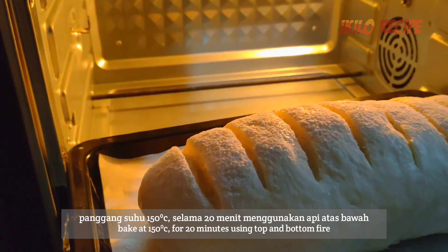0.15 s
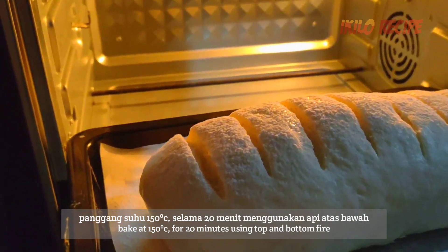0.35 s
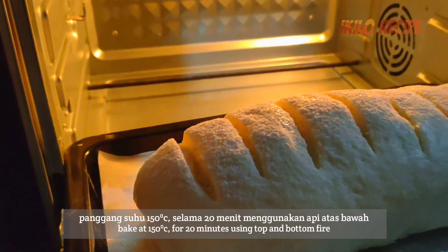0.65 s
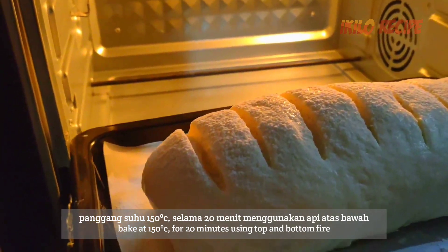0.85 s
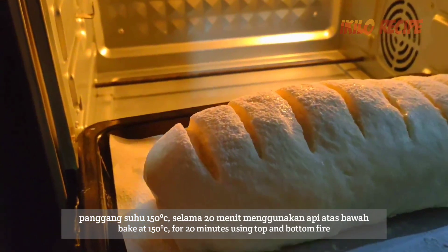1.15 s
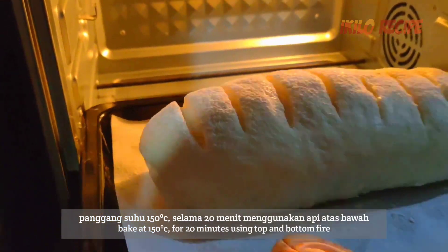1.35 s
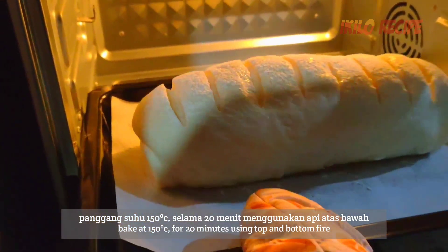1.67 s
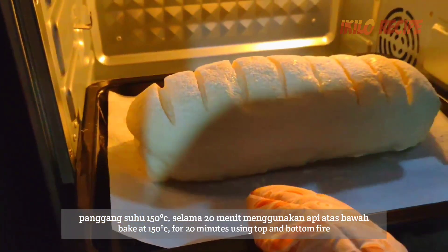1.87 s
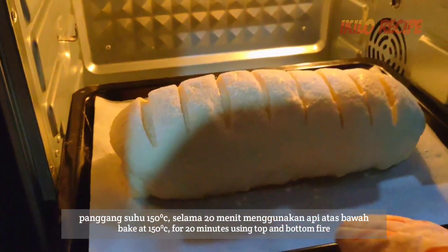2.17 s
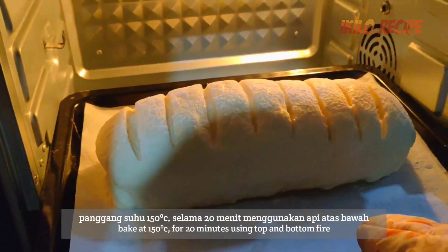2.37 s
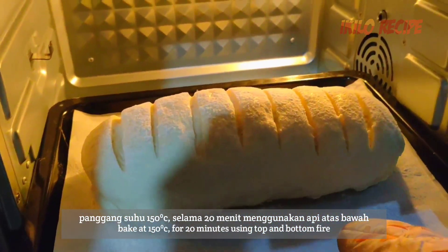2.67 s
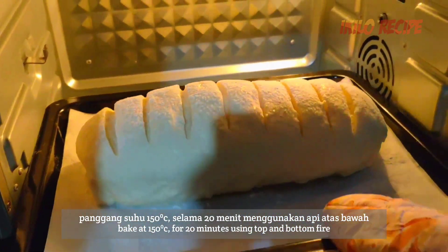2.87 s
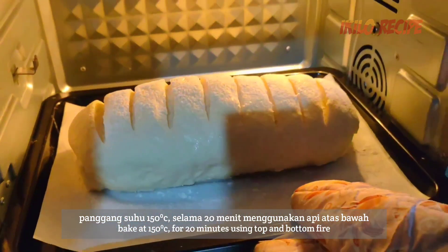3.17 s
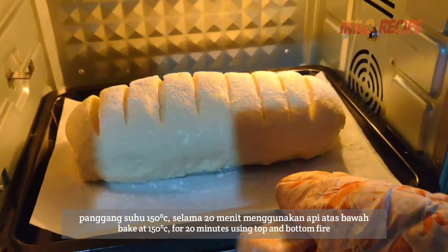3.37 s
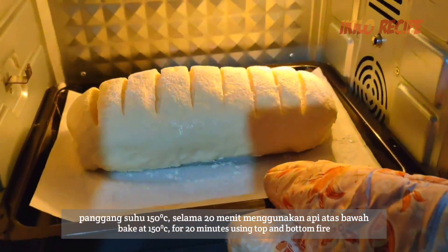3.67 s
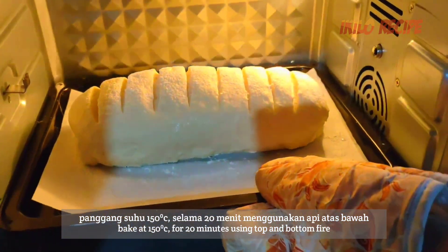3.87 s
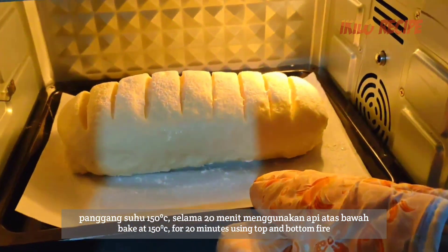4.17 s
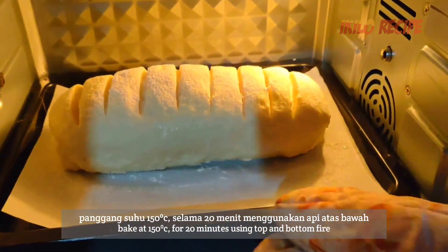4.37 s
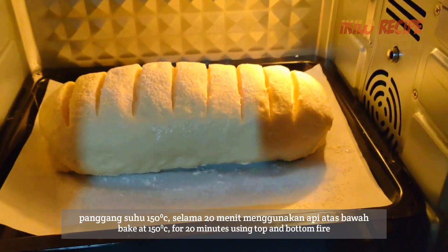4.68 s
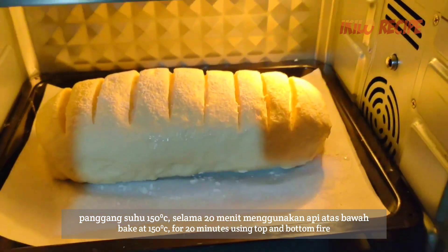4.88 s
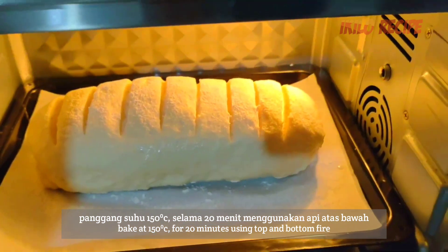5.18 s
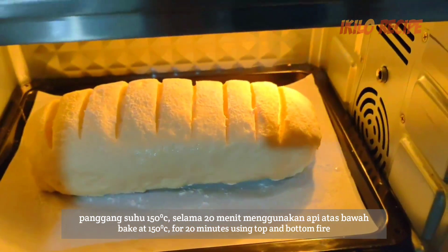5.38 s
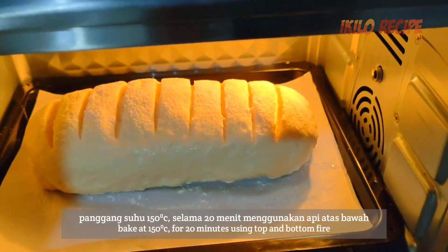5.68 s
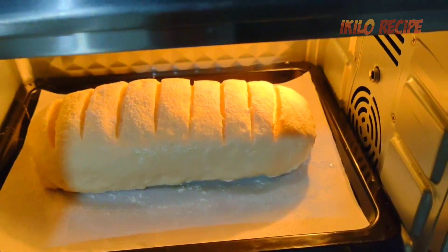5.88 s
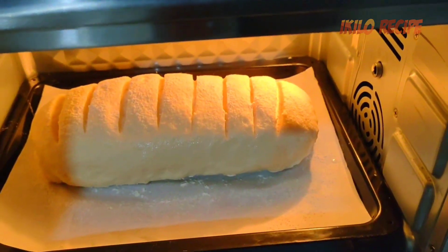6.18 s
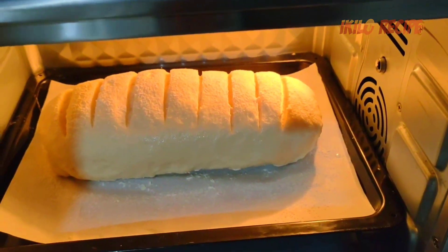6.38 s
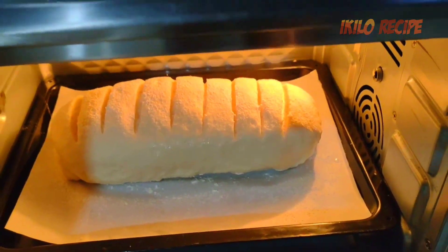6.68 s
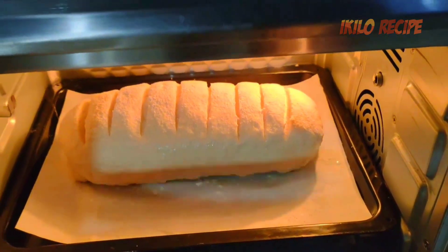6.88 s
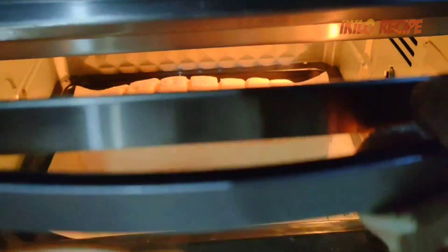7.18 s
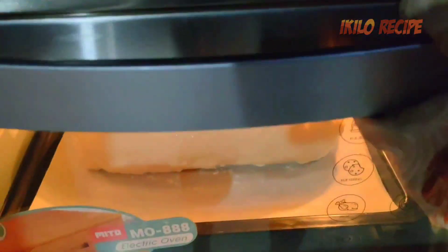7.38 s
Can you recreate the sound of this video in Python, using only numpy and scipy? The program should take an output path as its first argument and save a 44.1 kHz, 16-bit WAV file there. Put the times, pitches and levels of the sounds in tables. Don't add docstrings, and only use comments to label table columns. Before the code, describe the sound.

Close stereo pickup at a small metal oven in a quiet kitchen, with very low room hum and hiss. A clockwork timer ticks evenly throughout, roughly four dry clicks per second, slightly softer at first. From 0 to 1.4 s the tray barely moves: light hollow taps near 0.1, 0.5 and 1.2 s, faint rubbing and small squeaks. At 1.5 s a hard flat knock rebounds, followed by a clanking edge knock at 1.65 s, brisk gritty scraping and a weaker knock at 1.95 s. After a lull, scraping resumes around 2.7 s, with a dull knock at 3.05 s and a faint low one at 3.5 s. At 4.1 s the tray bangs the back wall, ringing briefly and humming low for about a second. Then mostly ticking, with tiny handling noises; fumbling and soft bumps increase from 6.6 s. At 7.5 s the glass door strikes its frame sharply and the sound cuts off.

```python
import sys
import numpy as np
from scipy import signal
from scipy.fft import rfft, irfft
from scipy.io import wavfile
from scipy.ndimage import uniform_filter1d

SR = 44100
rng = np.random.default_rng(int(sys.argv[2]) if len(sys.argv) > 2 else 0)


def volts(x):
    e = np.asarray(x, float) / 20
    return 10 ** e


def inscribe(sig):
    pcm = np.round(np.clip(np.atleast_2d(sig).T, -1, 1) * 32767)
    wavfile.write(sys.argv[1], SR, pcm.astype(np.int16))


N = 332514

# start in seconds, crack in dB, boom in dB, boom pitch in Hz, clang pitch in Hz.
FLAT_KNOCKS = [
    (1.5275, -22.5, -23, 228, 960),
    (1.5569, -30.5, -31, 213, 867),
    (3.05, -32, -30, 310, 610),
    (3.4935, -41.5, -41.5, 149, 845),
]
# start in seconds, crack in dB, boom in dB, boom and clang pitch in Hz.
EDGE_KNOCKS = [
    (1.6546, -23.5, -28, 275, 1115),
    (1.9455, -32, -35.5, 302, 1070),
    (4.9751, -63, -62, 380, 630),
]
# start in seconds, crack in dB, boom in dB, boom and clang pitch in Hz.
TAPS = [
    (0.1362, -44.5, -37.5, 202, 957),
    (0.4664, -68, -53, 224, 814),
    (1.1769, -49, -43, 148, 1003),
    (4.9751, -66, -73.5, 380, 640),
]
# start in seconds, crack in dB, boom in dB, boom pitch in Hz, clang pitch in Hz.
SCUFFS = [(1.045, -77, -57, 286, 790), (1.8384, -49.5, -58, 232, 2160), (1.99, -45.5, -37.5, 342, 836),
          (2.2515, -64, -41.5, 304, 670), (2.2979, -59.5, -43.5, 375, 1097), (2.4398, -58, -48, 293, 593),
          (3.089, -42.5, -38.5, 418, 885), (3.313, -50, -55, 194, 795), (3.6453, -55.5, -50.5, 330, 2190),
          (6.611, -60, -58, 237, 1330), (6.6224, -52, -51.5, 207, 1082), (6.8085, -65, -53.5, 247, 764),
          (6.9775, -56, -56, 268, 880), (6.996, -65, -50.5, 250, 554), (7.182, -58.5, -50.5, 240, 930),
          (7.196, -61.5, -48, 250, 554), (7.222, -78, -51, 250, 590), (2.5395, -61, -65, 293, 770)]
# start in seconds, crack in dB, boom in dB, boom and clang pitch in Hz.
BANG = [
    (4.0753, -21, -24.5, 188.6, 2184),
]
# start in seconds, crack in dB, boom in dB, boom pitch in Hz, clang pitch in Hz.
DOOR = [
    (7.5298, -20.5, -29.5, 262, 1582),
]
# pitch in Hz, level in dB, 60 dB decay in seconds.
SHELL = [(67, -8, 0.34), (107, -22, 0.2), (161, -16.5, 0.3), (176, -6, 0.56), (258, -4.5, 0.23),
         (275, -2, 0.81), (327.3, -4, 0.53), (381.7, -6.5, 0.58), (412, -15, 0.44), (488, -12.5, 0.39),
         (604, -25.5, .6), (814, -14, 0.61), (1220, -24.5, 0.22)]
# frequency in Hz, level in dB.
SHEET = [(300, -23.5), (450, -6.5), (800, -2.5), (1200, -6.5), (1600, -9), (2200, -8.5), (3000, -14),
         (4000, -15.5), (5000, -11.5), (5700, -13), (6500, -19), (7200, -25), (8300, -23), (10500, -31),
         (12100, -38), (15600, -34)]
# frequency in Hz, 60 dB decay in seconds.
SHEET_T60 = [(500, 1), (1500, 0.75), (3000, 0.51), (6000, 0.38), (12000, 0.39)]
# frequency in Hz, level in dB.
FLAT_TINT = [(450, -8.5), (900, 0.5), (1500, -1.5), (4200, 5), (5700, -1), (8300, 1.5), (15000, 2.5)]
EDGE_TINT = [(450, 5), (900, 5), (3000, -2.5), (5700, 1.5), (8300, -7.5), (12000, -5)]
LIGHT_TINT = [(450, -1), (1500, 0.78), (5700, -1), (9000, 1)]
WALL_TINT = [(450, 0.5), (800, -0.5), (1200, 1), (2200, 1), (3000, 1), (4000, -1), (5700, -1), (9000, 2.5),
             (12000, 1.5), (15000, 2.5)]
GLASS_TINT = [(450, -7), (900, 4), (1550, 9), (2500, -3), (4400, 2), (6500, 2), (9000, 10.5), (13000, 1.5)]
# pitch in Hz, peak in dB, 60 dB decay in seconds.
HUM = [(70, -33, 0.3), (114, -35, 0.45), (202, -41.5, 0.25), (264, -48.5, 1.9), (190, -50, 2),
       (387, -48, 1.6), (379, -35.5, .45), (434, -47.5, 0.75), (195, -48.5, 1.6), (275, -34.5, 0.3),
       (335, -40, 0.44), (368, -13.5, 0.11), (392, -25.5, 0.69), (412, -35, 0.59), (507, -29.5, 0.3),
       (522, -33.5, 0.36), (652, -40.5, .35), (823, -34, .35), (1226, -30, 0.21)]
# start in seconds, swell in seconds, hold in seconds, load in dB, speed in dB.
PUSHES = [(0.0, 0.013, 0.021, -60.5, -83.5), (0.044, 0.089, .05, -56, -74),
          (0.158, 0.053, .14, -53.5, -69.5), (0.396, 0.064, 0.14, -58.5, -70), (.62, 0.1, 0.12, -61.5, -69),
          (1.029, 0.048, 0.14, -59.5, -64.5), (1.182, 0.034, 0.15, -55.5, -70),
          (1.357, 0.14, .04, -48.5, -55.5), (1.57, 0.017, .08, -39.5, -58.5),
          (1.672, 0.082, 0.04, -41.5, -47.5), (1.798, 0.061, 0.058, -45.5, -43.5),
          (1.963, 0.039, 0.047, -42.5, -52), (2.12, 0.033, 0.055, -54, -74.5),
          (2.228, 0.035, 0.06, -52, -61.5), (2.412, 0.025, 0.11, -55, -70),
          (2.702, 0.15, 0.05, -49.5, -58.5), (2.848, 0.095, 0.19, -45, -53.5),
          (3.069, 0.032, 0.18, -49.5, -55.5), (3.292, 0.023, 0.13, -49, -60),
          (3.465, 0.02, 0.1, -46.5, -59), (3.594, 0.031, 0.12, -50, -56),
          (3.762, 0.064, 0.093, -51.5, -64.5), (3.879, 0.12, 0.091, -49, -53.5)]
# start, swell and hold in seconds, load in dB, speed in dB.
HANDLING = [(4.2, .05, 0.22, -71.5, -69), (4.699, 0.046, .08, -66.5, -76.5), (4.98, 0.091, 0.056, -68, -72),
            (5.21, 0.0394, 0.07, -76, -71.5), (5.46, 0.04, .2, -74, -78), (5.899, 0.055, 0.19, -72.5, -73),
            (6.17, 0.09, 0.071, -69, -70), (6.42, 0.11, 0.074, -66.5, -70),
            (6.6, 0.038, 0.14, -60.5, -67.5), (6.8, 0.066, 0.11, -57, -63.5), (7.0, .03, 0.092, -62, -74.5),
            (7.172, 0.018, 0.054, -58, -68), (7.249, 0.025, .08, -65, -73.5),
            (7.33, 0.1, .15, -61.5, -67.5)]
# frequency in Hz, level in dB.
GRIT = [(300, -29.5), (450, 6.5), (550, -9), (860, -10), (1500, -11.5), (2200, -6), (3100, -11),
        (4300, -11), (5800, -13.5), (6500, -18.5), (7300, -27), (8400, -23.5), (11500, -37), (15600, -27.5)]
# start and length in seconds, pitch and width in Hz,
# level in dB.
GROANS = [(.45, 0.48, 850, 110, -65), (0.691, 0.046, 1920, 250, -71), (0.99, 0.42, 890, 160, -59),
          (1.18, 0.068, 154, 30, -43), (1.23, 0.076, 150, 44, -47), (.7, .025, 1900, 300, -64),
          (0.87, .02, 3000, 1200, -62), (1.56, 0.16, 173, 94, -41), (1.83, 0.077, 2200, 650, -45),
          (1.97, 0.21, 158, 51, -52), (2.243, 0.32, 387, 180, -53.5), (2.987, 0.22, 2000, 1200, -50),
          (3.376, .12, 280, 260, -50.5), (3.45, .3, 143, 45, -49.5), (3.499, 0.25, 353, 100, -55.5),
          (4.151, .45, 350, 220, -57.5), (4.251, 0.52, 80, 39, -64.5), (5.05, 0.12, 2200, 780, -68.5),
          (4.968, 0.028, 640, 140, -56), (7.5, 0.13, 910, 120, -63), (8.5, .15, 550, 57, -62),
          (6.62, 0.06, 880, 200, -57), (10, 0.078, 360, 80, -53), (2.8, .06, 3000, 2500, -47.5),
          (5.064, 0.09, 620, 170, -63), (5.9, 0.53, 440, 40, -72.5), (5.999, 0.58, 1230, 400, -72.5),
          (6.429, 0.17, 1100, 1200, -66.5), (6.62, 0.086, 100, 50, -55), (6.81, 0.084, 215, 66, -57),
          (6.742, 0.072, 260, 97, -61), (3.05, 0.06, 162, 69, -42), (3.061, 0.058, 410, 130, -40.5),
          (.2, 0.17, 290, 100, -55), (1.89, 0.046, 4700, 500, -56), (1.714, 0.11, 4900, 810, -45.5),
          (6.784, 0.22, 1150, 920, -62.5), (6.776, 0.11, 1870, 110, -65), (7.178, 0.07, 560, 110, -58),
          (7.189, 0.096, 1100, 970, -72), (7.388, 0.098, 3900, 1400, -61)]
# frequency in Hz, level in dB.
TICK_COLOUR = [(590, -14), (1000, -9), (1730, -3.5), (2310, -6.5), (4300, -1), (5520, -3.5), (6050, -0.5),
               (7110, -7), (8540, -6), (15500, -23)]
# start in seconds, level in dB, pitch in Hz.
SHOVES = [
    (0.138, -57, 45),
    (1.53, -48, 45),
    (3.052, -42, 40),
    (3.5, -54, 45),
    (6.64, -60, 50),
    (7.0, -60, 50),
    (7.524, -36.5, 120),
]
# pitch in Hz, level in dB.
MAINS = [(145.3, -81.5), (193.8, -78.5), (274.5, -84), (387.6, -77.5), (586.8, -85.5), (640, -83),
         (829, -90), (1179, -92), (1276, -89)]
# frequency in Hz, level in dB.
KITCHEN = [(15, -57), (25, -9.5), (60, -1.5), (153, 3.5), (236, -5), (384, -0.5), (451, -6), (1260, -10.5),
           (1440, -16), (1890, -14), (5880, -14.5), (7510, -20.5), (11900, -23), (16000, -55)]
# frequency in Hz, level in dB.
PORT_TILT = [(400, -1.5), (900, 2.5), (2000, -1.5), (4800, -3), (5900, -10.5), (7000, 2), (8300, 9.5),
             (10000, 0.5), (14500, -1), (15500, -7)]
# time in seconds, left over right in dB.
SIDE_OF_MIC = [(0, 0.5), (1.4, 2.5), (2.6, 0.8), (4.202, -0.6), (5.2, -2.5), (6.4, -1.5), (7.5, 2)]
# frequency in Hz, threshold in standard deviations.
HOLES = [(2500, 3.0), (4000, 2.3), (6000, 2.3), (7200, .7), (8500, 1.5), (10000, .55), (15000, .4)]

SPLIT_HZ = 2500
CLANG_FROM_CRACK = 0.18
PING_SPREAD, PING_T60 = 0.055, 0.08
DOOR_TOP_HZ = 12800
BACK_WALL_HZ, BACK_WALL_SAG_HZ = 182, 17
BACK_WALL_DB, BACK_WALL_T60 = -28.5, 1.2
LOAD_FADE_DB_PER_S, SPEED_FADE_DB_PER_S, SWELL_DB = 107.5, 173.5, 15.5
RAIL_HZ, DRONE_DB, DRONE_SLOPE = 161.1, -5.5, 1.03
RUB_DB, RUB_FROM_LOAD = -5.5, 0.14
PANEL_SLOW_HZ, PANEL_FAST_HZ = 640, 865
FIRST_TICK_S, TICK_EVERY_S = 0.1012, 0.24381
TICK_DB, TOCK_DB, THUD_DB = -55.5, -54.5, -66
SHADED_UNTIL_S, SHADED_DB = 0.7, 4
DOOR_NEAR_S, DOOR_LIFT_DB = 6.55, 4
KITCHEN_DB = -66.5
MONO_HZ = 453
MIC_LOW_HZ, MIC_TOP_HZ = 79, 16300
HOLE_DB = -40


def evened(x):
    return x / np.sqrt(np.mean(x ** 2) + 1e-20)


def peak_one(x):
    return x / np.sqrt(uniform_filter1d(x ** 2, size=220).max() + 1e-20)


def steady(x, size=3000):
    return x / np.sqrt(abs(uniform_filter1d(x ** 2, size=size)) + 0.17 * np.mean(x ** 2))


def read(points, hz):
    f, value = np.transpose(points)
    return np.interp(np.log(hz + 1), np.log(f + 1), value)


def colour(x, points):
    hz = np.fft.rfftfreq(x.shape[-1], 1 / SR)
    return irfft(rfft(x) * volts(read(points, hz)), x.shape[-1])


def add(mix, s, sound):
    part = mix[..., round(s * SR):][..., :len(sound)]
    part += sound[:part.shape[-1]]


def split(x, hz, order=2):
    halves = [signal.butter(order, hz, kind, fs=SR, output="sos") for kind in ("low", "high")]
    return [signal.sosfilt(np.vstack([h, h]), x) for h in halves]


def rings(hz, db, t60, size, phase=0):
    t = np.arange(size) / SR
    decay = volts(db[:, None] - 60 * t / t60[:, None])
    return (decay * np.sin(2 * np.pi * hz[:, None] * t + phase)).sum(0)


def resonate(x, hz, width):
    turn = np.exp(2j * np.pi * np.cumsum(hz) / SR)
    r = np.exp(-np.pi * width / SR)
    return 2 * (turn * signal.lfilter([1 - r], [1, -r], x / turn)).real


def slide(grains_per_s=4000, spread_db=2.0):
    *rows, load_db, speed_db = np.transpose(PUSHES + HANDLING)
    s, t = np.arange(0, N, 64) / SR, np.arange(N) / SR
    load = effort(load_db, rows, LOAD_FADE_DB_PER_S, s)
    speed = effort(speed_db, rows, SPEED_FADE_DB_PER_S, s)

    lively_db = 2.0 * evened(uniform_filter1d(rng.standard_normal(N), size=900))
    size_db = spread_db * np.minimum(rng.exponential(1, N), 3) + lively_db
    grit = volts(size_db) * (rng.random(N) < grains_per_s / SR) * rng.choice([-1, 1], N)

    hz, db, t60 = np.transpose(SHELL[4:])
    shell = rings(hz, db - 16.0 * (hz > 560), 0.24 * t60, 9000, np.pi / 2)
    rumble = signal.oaconvolve(grit, shell)[:N]
    rail_hz = RAIL_HZ * np.array([0.78, 1.0, 1.17])
    rails = rings(rail_hz, np.array([-6.0, 0, -5]), np.full(3, 0.3), 9000)
    drone = signal.oaconvolve(grit, rails)[:N]

    rub, scrape = split(colour(grit, GRIT), SPLIT_HZ)
    quickness = np.clip((speed - load + 20) / 15, 0, 1)
    panel_hz = PANEL_SLOW_HZ + (PANEL_FAST_HZ - PANEL_SLOW_HZ) * quickness
    panel = resonate(grit, np.interp(t, s, panel_hz), width=60)
    rub = evened(rub) + 1.5 * evened(panel)

    layers = [(split(rumble, 150)[1], load - 2.5),
              (rub, RUB_DB + speed + RUB_FROM_LOAD * (load - speed)),
              (scrape, speed),
              (split(drone, 140)[1], DRONE_DB - 51.5 + DRONE_SLOPE * (load + 50))]
    total = sum(evened(steady(x)) * volts(np.interp(t, s, level_db)) for x, level_db in layers)
    return wander(total, patchy_db=2.0)


def effort(level_db, rows, fade_db, t):
    start, swell, hold = (v[:, None] for v in rows)
    rise_db = -SWELL_DB * np.clip(1 - (t - start) / swell, 0, 6) ** 2
    fall_db = -fade_db * np.maximum(t - start - swell - hold, 0)
    return 10 * np.log10((volts(level_db[:, None] + rise_db + fall_db) ** 2).sum(0) + 1e-10)


def wander(x, patchy_db):
    z = signal.stft(x, nperseg=512, noverlap=256)[2]
    patches = uniform_filter1d(rng.standard_normal(z.shape), size=10, axis=0)
    patches = uniform_filter1d(patches, size=15, axis=1)
    return signal.istft(z * volts(patchy_db * evened(patches)), nperseg=512, noverlap=256)[1][:N]


def knocks(rows, tint, clang_db, chatter_s, hand_db, spot_db, ping_db, buzz, ring_on, size):
    out, t = np.zeros(N), np.arange(size) / SR
    hz, db, t60 = np.transpose(SHELL)
    shade = [(f, level + read(tint, f)) for f, level in SHEET]
    hand = volts(-hand_db * t)
    contact = np.minimum(t / 0.0021, 1) * (np.exp(-(t / chatter_s) ** 2) + ring_on) * hand
    late_swell = (1 - np.exp(-t / (0.51 * chatter_s))) * (0.5 + np.exp(-t / 0.028)) * hand
    noises = rng.standard_normal((len(rows), 2, size))
    for (s, crack_db, boom_db, boom_hz, clang_hz), noise in zip(rows, noises):
        near_db = db - 3.6 * np.abs(np.log2(hz / boom_hz))
        modes = np.append(hz, boom_hz), np.append(near_db, spot_db), np.append(t60, 0.17)
        boom = peak_one(rings(*modes, size))
        loose = split(split(noise[1], 450)[0], 120)[1] * volts(-85 * t)
        boom = (boom + buzz * peak_one(loose)) * late_swell

        clang, crack = split(sheet(colour(noise[0], shade)) * contact, SPLIT_HZ)
        ping_hz = clang_hz * (1 + PING_SPREAD * np.array([-1, 0, 1.3]))
        ping = rings(ping_hz, ping_db - np.array([6.0, 0, 5]), np.full(3, PING_T60), size)
        ping *= np.minimum(t / 0.0012, 1) * hand
        between_db = boom_db + CLANG_FROM_CRACK * (crack_db - boom_db)

        add(out, s, volts(boom_db) * peak_one(split(boom, 62)[1]))
        add(out, s, volts(between_db + clang_db) * peak_one(peak_one(clang) + ping))
        add(out, s, volts(crack_db) * peak_one(crack))
    return out


def sheet(noise):
    hz, t, z = signal.stft(noise, SR, nperseg=256)
    decay = volts(-60 * t / read(SHEET_T60, hz)[:, None])
    return signal.istft(z * decay, SR, nperseg=256)[1][:len(noise)]


def hum(size=50000):
    out, t = np.zeros(N), np.arange(size) / SR
    sag = 0.5 + 0.5 * np.tanh((t - 0.33) / 0.21)
    wall_hz = BACK_WALL_HZ - BACK_WALL_SAG_HZ * sag
    wall = volts(BACK_WALL_DB - 60 * t / BACK_WALL_T60) * np.sin(2 * np.pi * np.cumsum(wall_hz) / SR)
    shell = rings(*np.transpose(HUM), size)
    add(out, BANG[0][0], (wall + shell) * (1 - np.exp(-t / 0.0045)))
    return out


def squeaks(size=22500):
    out, t = np.zeros(N), np.arange(size) / SR
    noises = rng.standard_normal((len(GROANS), size))
    for (s, length, hz, width, db), noise in zip(GROANS, noises):
        pitch = np.full(size, hz)
        tone = resonate(resonate(noise, pitch, width), pitch, width)
        swell = np.sin(np.pi * np.minimum(t / length, 1)) ** 2
        add(out, s, volts(db) * evened(tone) * swell)
    return out


def timer(size=6000, count=31):
    out, t = np.zeros(N), np.arange(size) / SR
    rattle = np.minimum(t / 0.0011, 1) * ((t < 0.005) + 0.54 * np.exp(-t / 0.028))
    case = np.array([135.0, 190, 390]), np.array([0.0, 0, -4]), np.array([0.15, 0.2, 0.15])
    thud = peak_one(rings(*case, size) * (1 - np.exp(-t / 0.0042)))
    for k, noise in enumerate(rng.standard_normal((count, size))):
        s = FIRST_TICK_S + k * TICK_EVERY_S
        lift_db = DOOR_LIFT_DB * (s > DOOR_NEAR_S) - SHADED_DB * (s < SHADED_UNTIL_S)
        tick_db = (TICK_DB, TOCK_DB)[k % 2] + lift_db
        add(out, s, volts(tick_db) * peak_one(colour(noise, TICK_COLOUR) * rattle))
        add(out, s + 0.0074, volts(THUD_DB + lift_db) * thud)
    return out


def shoves(size=4000):
    out, t = np.zeros(N), np.arange(size) / SR
    for s, db, hz in SHOVES:
        add(out, s, volts(db) * np.sin(2 * np.pi * hz * t) * np.exp(-hz * t * 0.8))
    return out


def mains():
    noise, out = rng.standard_normal(N), np.zeros(N)
    for hz, db in MAINS:
        line = resonate(noise, np.full(N, hz), width=3.7)
        out += volts(db) * evened(steady(line, size=9000))
    return out


def kitchen():
    noise = colour(rng.standard_normal((2, N)), KITCHEN)
    low = signal.sosfiltfilt(signal.butter(2, MONO_HZ, fs=SR, output="sos"), noise)
    return volts(KITCHEN_DB) * evened(noise - low + 0.78 * low[0] + 0.29 * low)


def port_responses(count, early_s, tail_db, t60, size):
    t = np.arange(size) / SR
    lead = rng.standard_normal((count, 1, size // 2 + 1))
    for _ in range(2):
        lead = uniform_filter1d(lead, size=150, axis=2)
    lead = 1.5 * np.tanh(2.5 * evened(lead)) * [[1], [-1]]
    direct = irfft((1 + 1j * lead) / np.sqrt(2), size)
    direct = np.roll(direct, round(early_s * SR), axis=2) * (t < 0.02)

    shape = (count, 2, size)
    echoes = rng.choice([-1.0, 1.0], shape) * (rng.random(shape) < 0.12)
    echoes *= volts(-60 * t / t60) * (t > early_s + 0.001)
    taps = direct + volts(tail_db) * echoes / np.linalg.norm(echoes, axis=2, keepdims=True)
    tilt_db = read(PORT_TILT, np.fft.rfftfreq(size, 1 / SR)) * [[0.5], [-0.5]]
    return irfft(rfft(taps) * volts(tilt_db), size)


def ports(x, early_s=0.003, size=13000, step=12000):
    taps = port_responses(N // step + 2, early_s, tail_db=-7.0, t60=0.3, size=size)
    low, high = split(x, MONO_HZ, order=3)
    high = np.pad(high, (step, 2 * step))
    both = np.zeros((2, N + 3 * step + size))
    share = np.sin(np.pi * np.arange(2 * step) / (2 * step)) ** 2
    for k, response in enumerate(taps):
        moment = high[k * step:][:2 * step] * share
        part = signal.fftconvolve(moment[None], response, axes=1)
        both[:, k * step:][:, :part.shape[1]] += part
    both = -both[:, step + round(early_s * SR):][:, :N]

    side_db = np.interp(np.arange(N) / SR, *np.transpose(SIDE_OF_MIC)) * [[0.5], [-0.5]]
    bass = low * volts([[0.3], [-0.3]]) + 0.099 * np.roll(low, 150) * [[1], [-1]]
    return bass + volts(side_db) * both


def scene():
    flat = knocks(FLAT_KNOCKS, FLAT_TINT, clang_db=-6.5, chatter_s=0.0058, hand_db=119.0, spot_db=13.5,
                  ping_db=-2.5, buzz=0.42, ring_on=0.25, size=15000)
    edge = knocks(EDGE_KNOCKS, EDGE_TINT, clang_db=-8.0, chatter_s=0.014, hand_db=129.0, spot_db=1.0,
                  ping_db=-9.0, buzz=0.39, ring_on=0.045, size=15000)
    light = knocks(TAPS, LIGHT_TINT, clang_db=2.8, chatter_s=0.0073, hand_db=79.0, spot_db=8.5,
                   ping_db=16.0, buzz=0.74, ring_on=0.55, size=15000)
    slipping = knocks(SCUFFS, LIGHT_TINT, clang_db=0.0, chatter_s=0.011, hand_db=179, spot_db=5.0,
                      ping_db=4.5, buzz=0.41, ring_on=0.5, size=9000)
    bang = knocks(BANG, WALL_TINT, clang_db=4.0, chatter_s=0.017, hand_db=0, spot_db=-14.0,
                  ping_db=0.5, buzz=1.2, ring_on=0.13, size=36000)
    door = knocks(DOOR, GLASS_TINT, clang_db=0.5, chatter_s=0.0088, hand_db=126.5, spot_db=7.0,
                  ping_db=1.0, buzz=0.22, ring_on=0.16, size=2000)
    door = split(door, DOOR_TOP_HZ, order=4)[0]
    tray = slide() + flat + edge + light + slipping + bang + hum()
    return ports(tray + door + squeaks() + timer() + shoves() + mains()) + kitchen()


def dropouts(x):
    hz, _, z = signal.stft(x, SR, nperseg=1024)
    chance = uniform_filter1d(rng.standard_normal(z.shape[1:]), size=9, axis=0)
    chance = evened(uniform_filter1d(chance, size=7, axis=1))
    empty = (chance > read(HOLES, hz)[:, None]) * (hz > 2500)[:, None]
    return signal.istft(z * volts(HOLE_DB * empty), nperseg=1024)[1][:, :N]


def roll_off(x):
    return signal.sosfilt(signal.butter(12, 15720, fs=SR, output="sos"), x)


def record(dry):
    x = signal.sosfilt(signal.butter(2, MIC_LOW_HZ, "high", fs=SR, output="sos"), dry)
    x = signal.sosfilt(signal.butter(12, MIC_TOP_HZ, fs=SR, output="sos"), x)
    power_db = 10 * np.log10(abs(uniform_filter1d((x ** 2).mean(0), size=2000)) + 1e-12)
    x = x * volts(np.clip(1.53 * (power_db + 61.0), -8, 0))
    return roll_off(dropouts(x))


dry = scene()
out = record(dry)
inscribe(out)
```